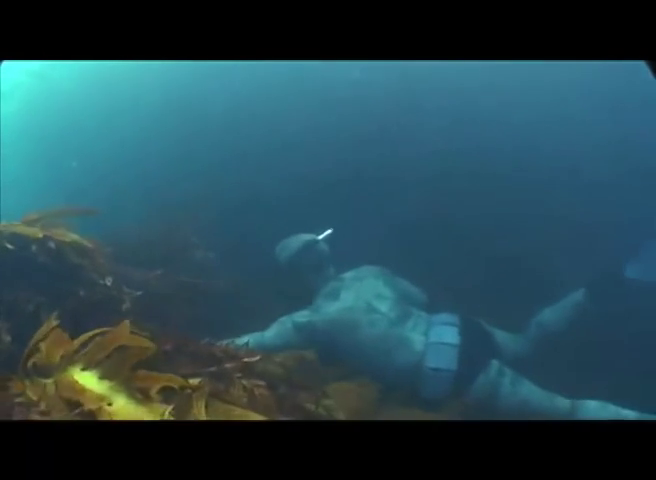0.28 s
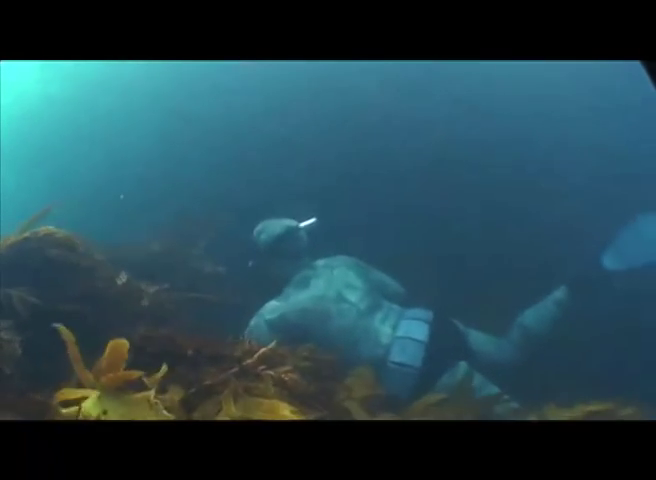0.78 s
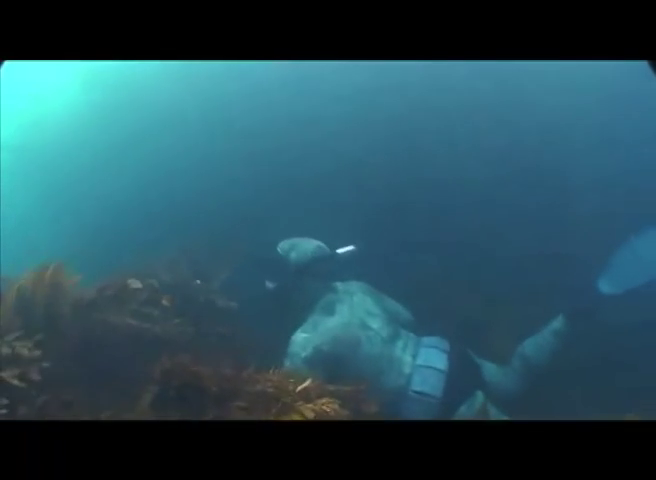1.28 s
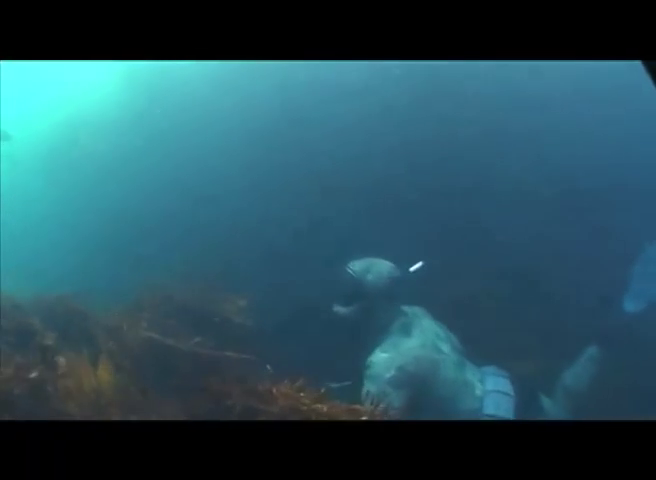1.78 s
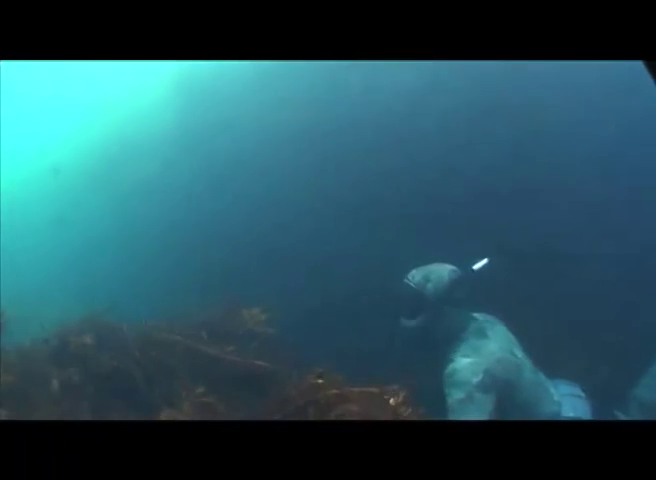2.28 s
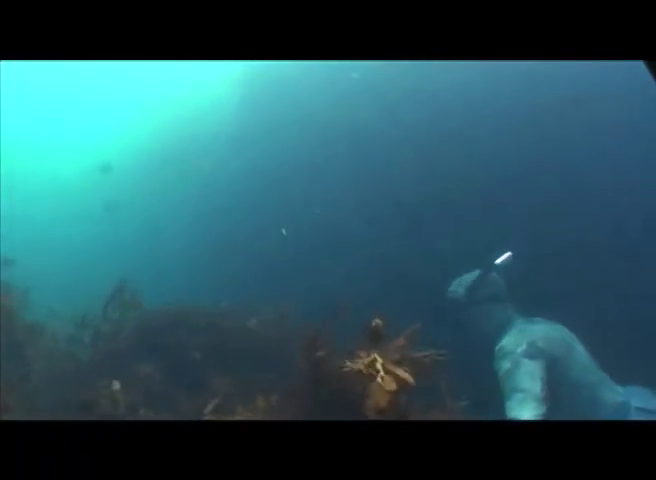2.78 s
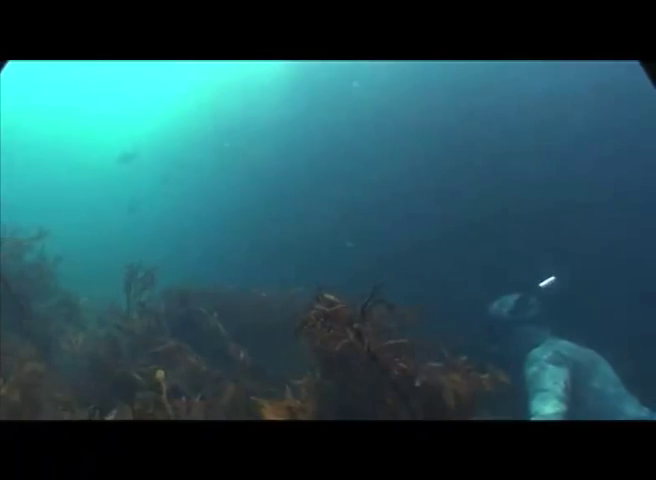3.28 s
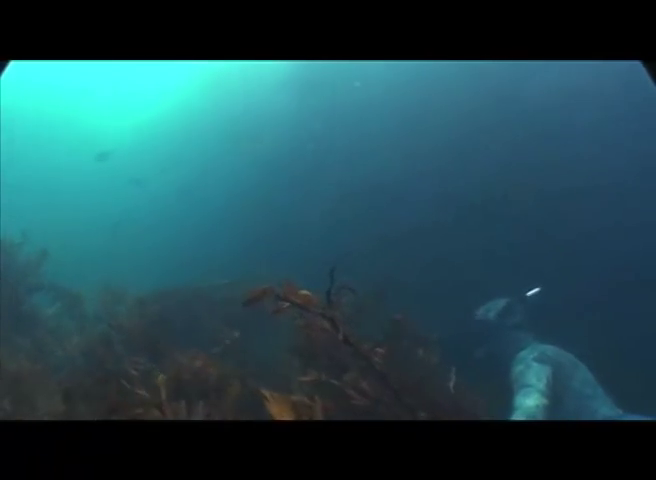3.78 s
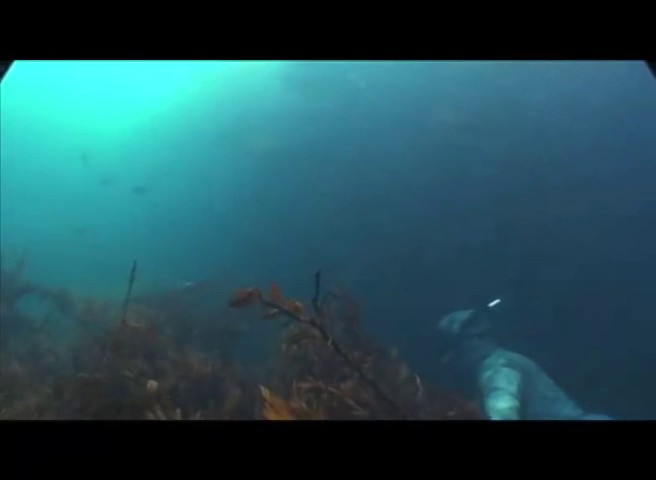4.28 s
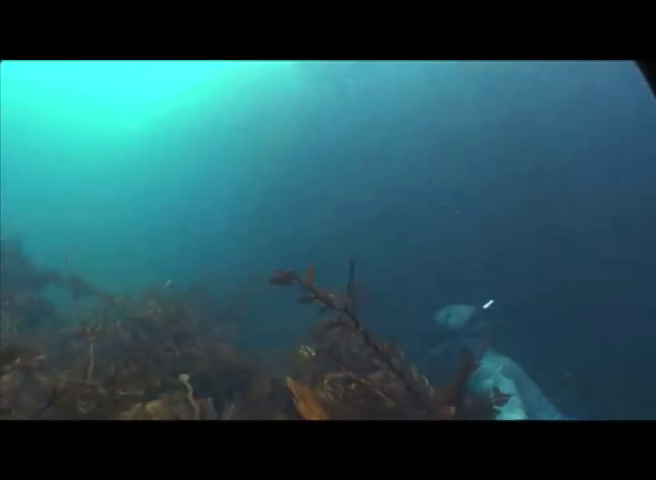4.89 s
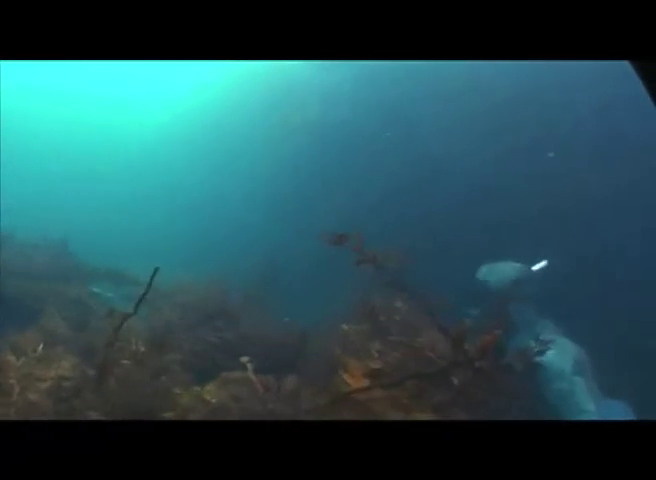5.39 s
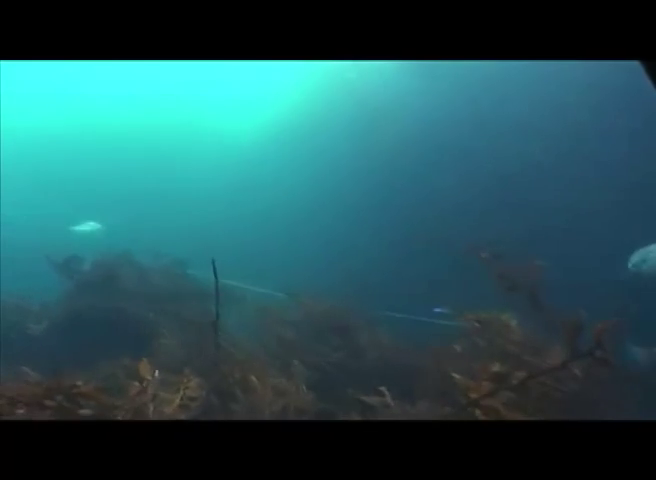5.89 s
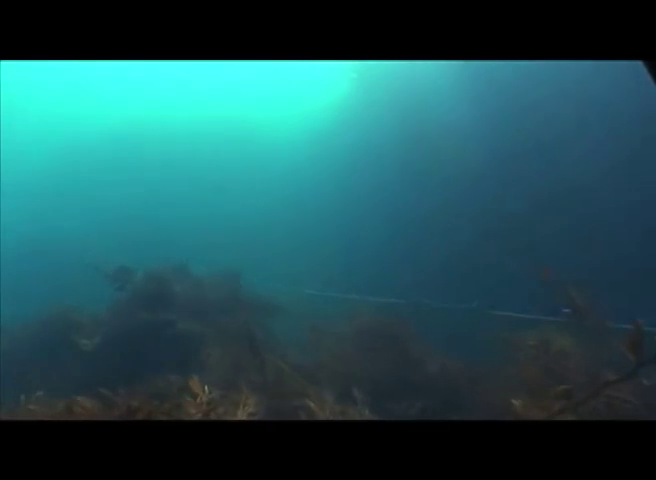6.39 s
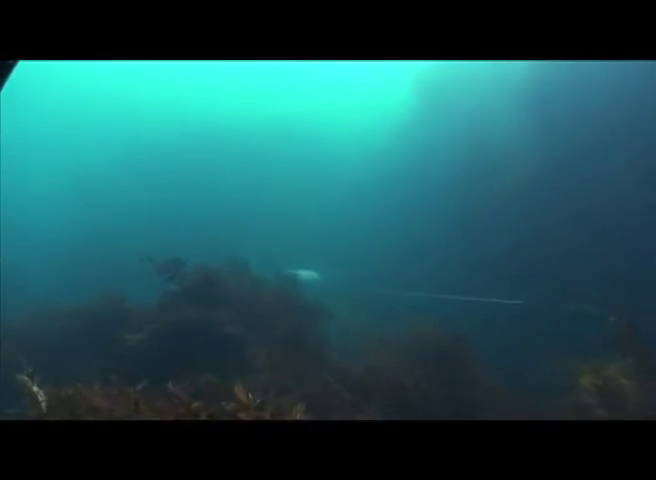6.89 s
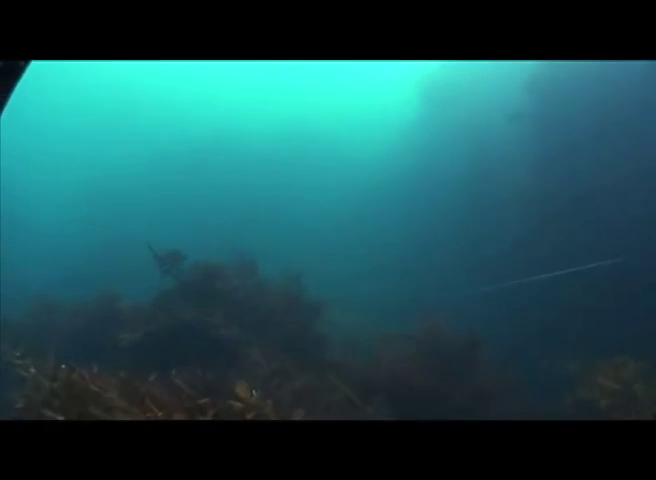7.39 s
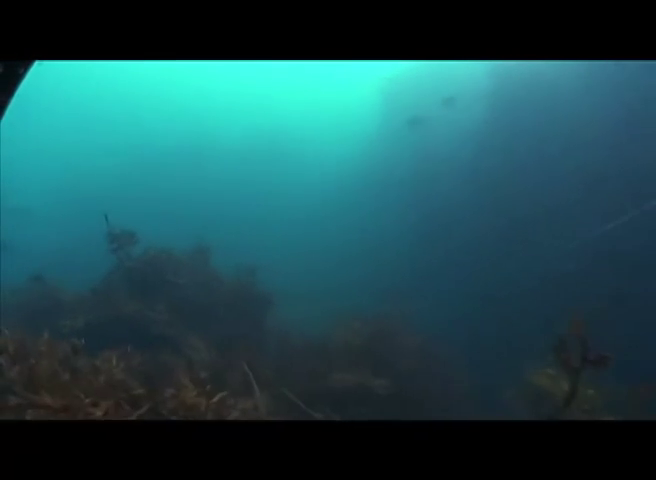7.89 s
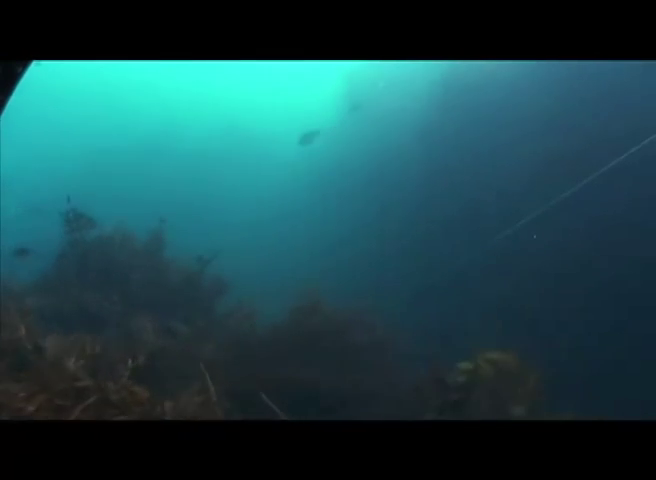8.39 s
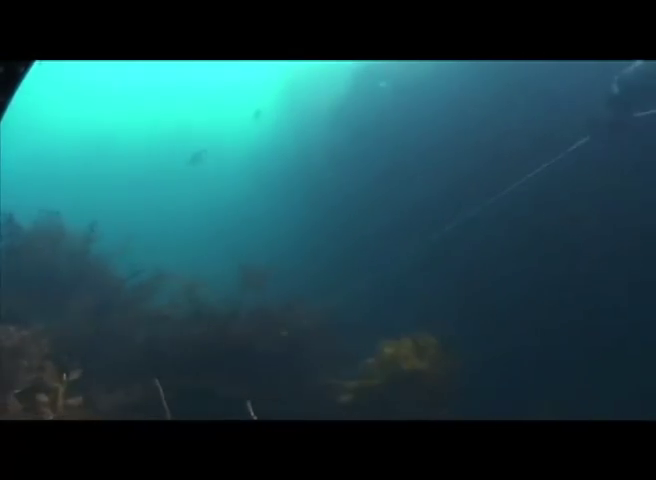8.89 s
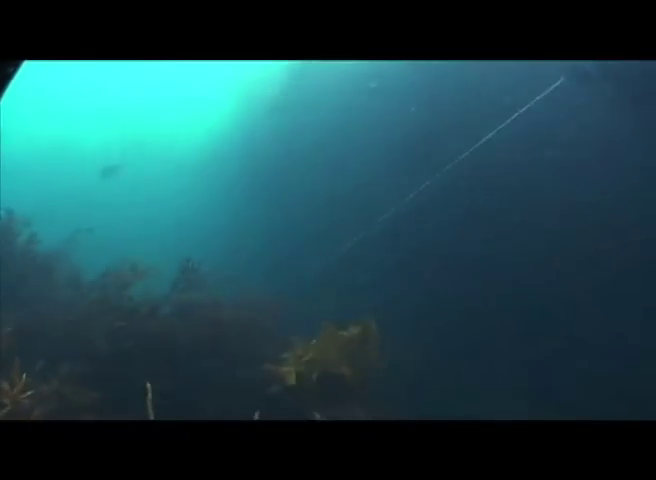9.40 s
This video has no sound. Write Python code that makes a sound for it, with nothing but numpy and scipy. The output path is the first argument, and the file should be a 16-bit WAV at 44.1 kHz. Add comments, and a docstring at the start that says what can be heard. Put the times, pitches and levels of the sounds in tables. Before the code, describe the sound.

Muffled underwater wash and wavering electronic hum inside a watertight case, with sharp shrimp snaps and a loud burst of hand knocks midway.

```python
"""A kelp reef under the sea, heard from a camera drifting in a watertight case.
The wash of the sea is noise that rings the case; the electronics hum and whine as wavering tones.
Shrimp snaps are short bursts of noise. The hand on the case taps, knocks and scrapes as noise bursts
that ring the case, and squeaks as short stacks of harmonics. Water sloshes, bumps and churns as low noise.
"""
import sys
import numpy as np
from scipy import signal
from scipy.fft import rfft, irfft, next_fast_len
from scipy.io import wavfile
from scipy.ndimage import uniform_filter1d

SR = 44100
rng = np.random.default_rng(int(sys.argv[2]) if len(sys.argv) > 2 else 0)


def store_wav(level_fs):
    """Save 16-bit WAV to argv[1]."""
    pcm = np.round(np.clip(np.atleast_2d(level_fs), -1, 1) * 32767)
    wavfile.write(sys.argv[1], SR, pcm.T.astype(np.int16))


N = 425565  # length in samples


def amp(db):
    """Turns decibels into a gain."""
    return 10 ** (np.asarray(db) / 20)


def unit(x):
    """Scales a sound to rms 1."""
    return x / np.sqrt(np.mean(x ** 2) + 1e-20)


def clock():
    """Time of every sample in seconds."""
    return np.arange(N) / SR


def read(points, hz):
    """Reads a curve of (f/Hz, level/dB) points, joined by lines on a log-frequency axis."""
    f, db = np.transpose(points)
    return np.interp(np.log(hz + 1), np.log(f + 1), db)


def add(mix, s, sound):
    """Mixes a sound in at time s."""
    part = mix[..., max(round(s * SR), 0):][..., :sound.shape[-1]]
    part += sound[..., :part.shape[-1]]


def bins(size=8192):
    """Frequencies in Hz on which filters are drawn."""
    return np.fft.rfftfreq(size, 1 / SR)


def colour(x, db):
    """Filters with the gain db(bins), never ahead of time: its peaks ring after the blow."""
    mirrored = np.concatenate([db, db[-2:0:-1]])
    log_gain = np.log(amp(mirrored))
    response = np.exp(np.conj(signal.hilbert(log_gain)))  # minimum phase
    taps = np.fft.ifft(response).real[:len(db)]
    return signal.oaconvolve(np.atleast_2d(x), taps[None], axes=1)


def wander(rate_hz):
    """A random line of rms 1 that heads for a new value rate_hz times a second."""
    knots = rng.standard_normal(400)
    return unit(np.interp(clock() * rate_hz, np.arange(len(knots)), knots))


def dying(start_s, rise_s, fade_db_per_s):
    """An envelope that rises from start_s on while fading by a steady number of dB a second."""
    age = np.maximum(clock() - start_s, 0)
    return np.minimum(age / rise_s, 1) * amp(-fade_db_per_s * age)


def ports(mid, side, apart):
    """Left and right: the two microphones differ by the side noise, coloured by the curve apart."""
    side = colour(side, read(apart, bins()))[0, :len(mid)]
    return np.array([mid + side, mid - side])


def low_noise(hz, octaves, window, apart=0.1):
    """Noise in a band around hz, under a window, nearly alike at both microphones; shared part has rms 1."""
    size = next_fast_len(len(window) + SR)
    distance = np.log2((bins(size=size) + 1) / hz) / octaves
    band = np.exp(-.5 * distance ** 2)
    noise = irfft(rfft(rng.standard_normal((2, size))) * band)
    mid, side = noise[:, :len(window)] * window
    return unit(mid) + np.array([[apart], [-apart]]) * unit(side)


def rattle(seconds, size=4096, count=3):
    """A quickly rising, dying burst of noise that holds all frequencies about equally."""
    t = np.arange(size) / SR
    fade = (1 - np.exp(-t / .0007)) * np.exp(-t / max(seconds, .0002))
    burst = rng.standard_normal((2, size)) * fade
    for _ in range(count):  # even out the spectrum, then restore the fade
        even = irfft(np.exp(1j * np.angle(rfft(burst))))
        loudness = np.sqrt(abs(uniform_filter1d(even ** 2, size=90)) + 1e-12)
        burst = fade * even / loudness
    return burst


def strike(db, seconds, shape_db, apart):
    """A burst coloured by shape_db; its shared part has the energy of 10 ms at level db."""
    mid, side = colour(rattle(seconds), shape_db)
    gain = amp(db) * np.sqrt(SR / 100 / np.sum(mid ** 2))
    return gain * ports(mid, side, apart)


def contact_db(centre_hz, treble_db, below, above, treble):
    """A hump of force around centre_hz with slopes in dB an octave, plus a thin crack of treble."""
    octaves = np.log2((bins() + 10) / centre_hz)
    hump = 1 / (amp(-below * octaves) + amp(above * octaves))
    return 20 * np.log10(2 * hump + amp(treble_db + read(treble, bins())))


# how firmly the hand clamps the case: (t/s, grip 0-1)
HAND_GRIP = [(3.7, 0), (4.4, 1), (5.5, 1), (6, 0)]


def grip_at(s):
    """How firmly the case is held at time s."""
    return np.interp(s, *np.transpose(HAND_GRIP))


# resonances of the case, before each sound scales them:
# (f/Hz, width/Hz, lift level/dB when held loosely, lift level/dB when gripped)
CASE_RESONANCES = [(500, 140, 5.5, 11.5), (621.5, 52, 15, 7.5), (743, 69, 2, 1.5), (896, 15, 0.5, 6),
                   (1035, 35, 1.5, 8), (1135.5, 111, 12.5, 15.5), (1402, 99, 3, 8.5), (1611, 84, 10, 14),
                   (1797, 50, 6, 2), (1950, 86, 0, 9.5), (2104, 178, 12.5, 10.5), (2496, 170, 8.5, 13),
                   (2674, 160, 10, 5), (3050, 40, -5, 10), (3276, 130, 11.5, 2.5), (3520, 130, -3, 9),
                   (3950, 180, 2, 8.5), (5690, 80, 24, 11.5), (6650, 560, 9, 9), (7550, 450, 0.5, 6.5)]


def case_db(grip):
    """Lift of the case's resonances at every frequency; a firm grip favours other ones."""
    total = 0
    for hz, width, free_db, held_db in CASE_RESONANCES:
        lift = free_db + grip * (held_db - free_db)
        total = total + lift / (1 + (2 * (bins() - hz) / width) ** 2)
    return total


# relative spectrum of the wash before the case colours it: (f/Hz, level/dB per Hz)
SEA_SPECTRUM = [(10, 6.5), (35, 2), (70, -1.5), (190, -26), (400, -7.5), (550, -2), (780, 3), (880, -13.5),
                (1050, -5), (1500, 1), (2400, -4.5), (3000, -23), (4500, -23), (9000, -28)]
SEA_DB = -51


def sea(ringing=0.98, swell_db=.5, grain_db=2.5):
    """Countless far crackles merge into a gently swelling wash that rings the case."""
    sizes = np.minimum(rng.exponential(1, N), 5)
    crackle = rng.standard_normal(N) * amp(grain_db * sizes)
    shape = read(SEA_SPECTRUM, bins()) + ringing * case_db(grip=0)
    wash = colour(crackle, shape)[:, :N]
    return amp(SEA_DB + swell_db * wander(5)) * unit(wash)


# relative spectrum of the hiss that differs between the two microphones: (f/Hz, level/dB per Hz)
HISS_SPECTRUM = [(20, 3), (120, -2), (350, 2.5), (750, 4.5), (900, -1), (1050, 5.5), (1200, 1.5),
                 (2000, -2.5), (3700, -5.5), (5000, -12), (7000, -9), (10500, -19), (15000, -75)]
HISS_DB, TOP_DB = -53.5, -72.5


def hiss():
    """Each microphone adds its own noise; a faint high hiss is the same in both."""
    own = colour(rng.standard_normal((2, N)), read(HISS_SPECTRUM, bins()))[:, :N]
    high = [(3000, -15), (9000, -2), (11500, 1.5), (15000, -3)]
    top = colour(rng.standard_normal(N), read(high, bins()))[:, :N]
    return amp(HISS_DB) * unit(own) + amp(TOP_DB) * unit(top)


def tone(hz, db, apart, waver_db=2.0, drift=0.88, waver_hz=5):
    """A tone wavering in level and phase (drift, radians), out of step at the microphones by +-apart."""
    phase = 2 * np.pi * (hz * clock() + rng.random()) + drift * wander(waver_hz)
    level = np.sqrt(2) * amp(db + waver_db * wander(waver_hz))
    return level * np.sin(phase + np.array([[apart], [-apart]]))


DRONE_HZ, DRONE_DB = 575.7, -59.5
BEAT_DB, BEAT_S, BEAT_DIP_S = 5, 3.93, .4  # swing either way, period, time of the first dip


def drone():
    """A low tone of the electronics swells and fades in a slow, even beat."""
    beat = np.cos(2 * np.pi * (clock() - BEAT_DIP_S) / BEAT_S)
    return tone(DRONE_HZ, DRONE_DB - BEAT_DB * beat, apart=0.22)


# main tone of the hum, level before it flutters: (f/Hz, level/dB rms)
FLUTTER_TONE = (600, -56.5)
# steady tones of the hum, level before they waver: (f/Hz, level/dB rms)
HUM_TONES = [(475, -71), (1006, -69), (1150, -63), (1803, -64), (1822, -70), (1954, -73), (2182, -62),
             (2277, -71), (2374, -72), (2638, -72), (3093, -73), (3286, -75)]


def hum():
    """The electronics hum on many tones; the main one flutters faster than the rest."""
    out = tone(*FLUTTER_TONE, apart=.05, waver_db=3.0, drift=0.83, waver_hz=16)
    for hz, db in HUM_TONES:
        out += tone(hz, db, apart=0.089)
    return out


# high steady tones of the electronics, level before they waver: (f/Hz, level/dB rms)
WHINE_TONES = [(3741, -81), (4502, -81), (4886, -81), (5098, -80), (5398, -77), (5696, -75), (5741, -82),
               (6216, -82), (6372, -77), (6391, -69), (6566, -80), (6600, -77), (6675, -79), (6716, -74),
               (7740, -78), (7962, -84), (8338, -86)]


def whine():
    """The electronics whine on high tones, each leading at one microphone or the other by chance."""
    return sum(tone(hz, db, apart=0.17 * rng.choice([-1, 1])) for hz, db in WHINE_TONES)


# relative strength of the faint sidebands around the whine: (f/Hz, level/dB)
HAZE_SPECTRUM = [(3000, -27), (4300, -39), (4900, 13), (5300, 4), (6100, -5), (6350, 16.5), (6750, 10),
                 (7100, -21), (8700, 7), (9300, -16), (11000, -10)]
HAZE_DB, HAZE_UNEVEN_DB = -68, 5
FRAME_HZ = 25  # the camera's frame rate


def haze():
    """A haze of faint, steady sidebands spaced by the camera's frame rate."""
    hz = np.arange(3000, 11000, FRAME_HZ)
    level = amp(read(HAZE_SPECTRUM, hz) + HAZE_UNEVEN_DB * rng.standard_normal(len(hz)))
    # partly different phases at the two microphones
    phase = 2 * np.pi * rng.random(len(hz)) + 0.64 * rng.standard_normal((2, len(hz)))
    lines = np.zeros((2, N // 2 + 1), complex)
    lines[:, np.round(hz * N / SR).astype(int)] = level * np.exp(1j * phase)
    return amp(HAZE_DB) * unit(irfft(lines, N))


# near shrimp snaps: (t/s, level/dB over 10 ms of the ring, centre f/Hz, treble level/dB)
NEAR_SNAPS = [(.200, -44.5, 2600, -19), (.332, -50, 2570, -21), (1.651, -45, 3000, -7),
              (1.7155, -48, 4100, -27), (1.9852, -42, 2700, -26), (2.4085, -40.5, 3530, -40),
              (2.615, -45.5, 2400, -27), (2.885, -48.5, 2590, -32), (3.6135, -46, 3400, -24),
              (6.652, -38.5, 2630, -21), (7.114, -48, 4200, -25), (7.354, -47, 3660, -32),
              (8.8865, -46, 4740, -6)]
FAR_SNAPS_PER_S, FAR_DB, FAR_SPREAD_DB = 14, -64, 2.5
SNAP_RING_S, SNAP_CRACK_S, SNAP_CRACK_DB = 0.0048, 0.00018, -4


def snaps(ragged_db=3.5):
    """Shrimp snaps, each a crack and a short ring: near ones over a random crackle from the reef."""
    out = np.zeros((2, N))
    crack = [(300, -30), (3000, 10.5), (6000, 1), (8000, 5.5), (11500, -5.0), (15000, -18)]
    apart = [(1500, -24), (4000, -2.5), (8000, -6), (12000, -24)]
    when, size, pitch, edge = rng.random((round(FAR_SNAPS_PER_S * N / SR), 4)).T
    far_level = FAR_DB - FAR_SPREAD_DB * np.log(size + 0.0083)
    far = np.transpose([when * N / SR, far_level, 2200 * 2 ** (1.2 * pitch), -24 + 16 * edge])
    knots = np.arange(0, SR / 2, 450)
    case, crack_shape = 0.81 * case_db(grip=1 / 2), read(crack, bins())
    for s, db, hz, treble_db in list(NEAR_SNAPS) + list(far):
        # each path over the rocks favours other bands
        ragged = np.interp(bins(), knots, rng.standard_normal(len(knots)))
        force = contact_db(hz, treble_db - 0.5, below=16.7, above=25, treble=crack)
        add(out, s, strike(db, SNAP_RING_S, force + case + ragged_db * ragged, apart))
        add(out, s, strike(db + treble_db + SNAP_CRACK_DB, SNAP_CRACK_S, crack_shape, apart))
    return out


# a higher contact is shorter and cracks more; rattle and crack values hold at CONTACT_HZ
CONTACT_HZ = 1500
RATTLE_S, RATTLE_HALVINGS_PER_OCTAVE = 0.00527, 0.12
CRACK_DB, CRACK_DB_PER_OCTAVE = -29.5, 7.5
FREE_RINGING = 0.16  # extra share of ringing when held loosely


def contact(s, db, hz, seconds, crack_db):
    """One touch of the case: a brief rattle that rings its resonances."""
    crack = [(100, 1.0), (1500, 16.0), (5000, 2), (6000, -21), (7300, 1.5), (9500, -3.5), (15000, -22)]
    apart = [(200, -42), (700, -15), (1300, -11), (2300, -16), (4300, -3), (8000, -4), (12000, -33)]
    grip, octaves = grip_at(s), np.log2(hz / CONTACT_HZ)
    ring = (1 + FREE_RINGING * (1 - grip)) * case_db(grip)
    treble_db = crack_db + CRACK_DB_PER_OCTAVE * octaves
    force = contact_db(hz, treble_db, below=21.0, above=19.4, treble=crack)
    return strike(db, seconds / 2 ** (RATTLE_HALVINGS_PER_OCTAVE * octaves), force + ring, apart)


TAPS_PER_S, TAP_DB, TAP_SPREAD_DB, TAP_HZ, TAP_OCTAVES = 3, -48, 10, 1300, .7


def taps():
    """Light taps of shifting fingers touch the case at random."""
    out = np.zeros((2, N))
    for when, weak, pitch in rng.random((round(TAPS_PER_S * N / SR), 3)):
        s = when * N / SR
        hz = TAP_HZ * 2 ** (TAP_OCTAVES * (pitch - .5))
        add(out, s, contact(s, TAP_DB - TAP_SPREAD_DB * weak, hz, RATTLE_S, CRACK_DB))
    return out


# dull pushes of water against the case: (t/s, level/dB rms)
WATER_PUSHES = [(1.53, -66.5), (2.257, -63), (3.63, -59), (4.277, -54), (4.501, -53), (4.699, -54),
                (5.83, -65)]
SLOSH_S, SLOSH_HZ, SLOSH_OCTAVES = 0.0604, 108, .6


def sloshes():
    """Soft swells of low noise as water pushes on the case."""
    out = np.zeros((2, N))
    for s, db in WATER_PUSHES:
        add(out, s, amp(db) * low_noise(SLOSH_HZ, SLOSH_OCTAVES, np.hanning(round(SLOSH_S * SR))))
    return out


# knocks on the case: (t/s, level/dB over 10 ms without the thump, centre f/Hz)
CASE_KNOCKS = [(2.494, -41.5, 1490), (3.4908, -24.5, 1670), (3.4937, -24, 1380), (4.55, -20.5, 1480),
               (4.5565, -14.5, 760), (4.5616, -15, 1440), (4.572, -19.5, 1510), (4.5797, -17.5, 1890),
               (4.5942, -21, 1050), (4.7027, -38.5, 3520), (5.3892, -27, 1730), (5.39, -40.5, 6800),
               (5.4298, -27.5, 1480), (5.432, -49, 7060), (6.949, -41, 1110)]
# the gripping hand adds a thump that grows faster than the blow and equals it at THUMP_EVEN_DB
THUMP_HZ, THUMP_S, THUMP_EVEN_DB, THUMP_GROWTH = 674, 0.00438, -8.5, 0.56


def knocks():
    """Blows rattle briefly and ring the case; a gripping hand adds a low thump."""
    out = np.zeros((2, N))
    for s, db, hz in CASE_KNOCKS:
        add(out, s, contact(s, db, hz, RATTLE_S, CRACK_DB))
        thump_db = db + THUMP_GROWTH * (db - THUMP_EVEN_DB)
        add(out, s, grip_at(s) * contact(s, thump_db, THUMP_HZ, THUMP_S, CRACK_DB))
    return out


# short hollow bumps: (t/s, level/dB rms, centre f/Hz)
HOLLOW_BUMPS = [(2.779, -43, 556), (2.898, -46.5, 570), (4.679, -46.5, 390), (6.735, -46.5, 550),
                (7.688, -42, 588), (8.705, -47.5, 610)]
BUMP_S, BUMP_OCTAVES = 0.026, 0.16


def bumps():
    """Short hollow bumps: narrow bands of noise that swell and fade smoothly."""
    out = np.zeros((2, N))
    for s, db, hz in HOLLOW_BUMPS:
        add(out, s, amp(db) * low_noise(hz, BUMP_OCTAVES, np.hanning(round(BUMP_S * SR))))
    return out


# the hand scrapes over the case: (t/s, level/dB over 10 ms without the thump, centre f/Hz)
HAND_SCRAPES = [(4.473, -45, 2700), (4.5202, -27, 2240), (4.531, -29, 2900), (4.603, -36, 2100),
                (5.226, -44.5, 2300), (5.354, -41.5, 2900), (5.367, -34.5, 2000), (5.4, -36, 1500),
                (5.862, -36.5, 945)]
SCRAPE_S, SCRAPE_CRACK_DB, SCRAPE_THUMP_DB = 0.015, -23, -10.5  # the thump is relative to the scrape


def scrapes():
    """The hand scrapes over the case: a longer rattle than a knock, with a softer thump beneath."""
    out = np.zeros((2, N))
    for s, db, hz in HAND_SCRAPES:
        add(out, s, contact(s, db, hz, SCRAPE_S, SCRAPE_CRACK_DB))
        add(out, s, contact(s, db + SCRAPE_THUMP_DB, THUMP_HZ, SCRAPE_S, CRACK_DB))
    return out


CHURN_START_S, CHURN_RISE_S, CHURN_LUMPS_PER_S, CHURN_LUMPY_DB = 4.55, .015, 30, 2.8
CHURN_DB, CHURN_FADE_DB_PER_S, CHURN_HZ, CHURN_OCTAVES = -43.5, 57, 115, 1.8
WAKE_DB, WAKE_FADE_DB_PER_S, WAKE_HZ, WAKE_OCTAVES = -64.5, 5, 290, 0.54


def churn():
    """Water stirred at the hardest knocks rumbles in lumps and settles, leaving a faint wake."""
    rumble = amp(CHURN_DB) * low_noise(CHURN_HZ, CHURN_OCTAVES, np.ones(N))
    rumble *= dying(CHURN_START_S, CHURN_RISE_S, CHURN_FADE_DB_PER_S)
    wake = amp(WAKE_DB) * low_noise(WAKE_HZ, WAKE_OCTAVES, np.ones(N))
    wake *= dying(CHURN_START_S, CHURN_RISE_S, WAKE_FADE_DB_PER_S)
    return (rumble + wake) * amp(CHURN_LUMPY_DB * wander(CHURN_LUMPS_PER_S))


# fingers slipping on the case:
# (t/s, length t/s, level/dB rms, start f/Hz, end f/Hz, fall level/dB per harmonic)
FINGER_SQUEAKS = [(5.018, 0.043, -46, 827, 840, 6), (5.128, 0.049, -44.5, 833, 830, 3),
                  (7.574, 0.033, -47, 788, 816, 5.5), (7.657, 0.039, -43, 824, 820, 4),
                  (9.462, 0.051, -44.5, 147, 125, 13)]
# strength of each harmonic in turn, before the fall: (level/dB)
HARMONIC_LEVELS = [-2.5, 1, 8, -7, -16]


def squeaks(jitter=0.026, rough=0.34):
    """Stick and slip of a finger: a short stack of harmonics, unsteady in pitch and strength."""
    out = np.zeros(N)
    for s, seconds, db, start_hz, end_hz, fall_db in FINGER_SQUEAKS:
        n = round(seconds * SR)
        smooth = unit(uniform_filter1d(rng.standard_normal((2, SR)), size=110))
        unsteady, strength = smooth[:, :n]
        turns = np.cumsum(np.linspace(start_hz, end_hz, n) * (1 + jitter * unsteady)) / SR
        stack = np.zeros(n)
        for k, h in enumerate(HARMONIC_LEVELS):
            stack += amp(h - fall_db * k) * np.sin(2 * np.pi * (k + 1) * turns)
        add(out, s, amp(db) * unit(stack * (1 + rough * strength) * signal.windows.tukey(n, .6)))
    return out


BUZZ_START_S, BUZZ_RISE_S, BUZZ_FADE_DB_PER_S = 5.35, .1, 6
BUZZ_HZ, BUZZ_DB, BUZZ_OCTAVE_DB = 150, -71, -68  # levels before the fade


def buzz():
    """A low buzz, a tone and its octave, comes up quickly and dies away slowly."""
    pair = tone(BUZZ_HZ, BUZZ_DB, apart=0) + tone(2 * BUZZ_HZ, BUZZ_OCTAVE_DB, apart=0)
    return dying(BUZZ_START_S, BUZZ_RISE_S, BUZZ_FADE_DB_PER_S) * pair


def scene():
    """Everything that reaches the microphones inside the case."""
    steady = sea() + hiss() + drone() + hum() + whine() + haze()
    hand = taps() + knocks() + scrapes() + squeaks()
    water = sloshes() + bumps() + churn()
    return steady + snaps() + hand + water + buzz()


# left minus right sensitivity of the microphones: (f/Hz, level/dB)
MICROPHONE_TILT = [(60, 0.5), (370, 2.5), (690, -0.5), (1270, 0), (2330, -1.5), (4300, 0), (7900, -3.5),
                   (14500, 1.5)]
EDGE_HZ = 15050  # upper band limit


def record(dry, lag=0.15):
    """The microphones differ a little in colour, the left lags (radians) in the mids; then the band limit."""
    hz = np.fft.rfftfreq(N, 1 / SR)
    angle = lag * np.interp(hz, [0, 2000, 4000, 9000], [0, 1, 1, 0])
    left = amp(read(MICROPHONE_TILT, hz) / 2) * np.exp(-.5j * angle)
    heard = irfft(rfft(dry) * np.array([left, 1 / left]), N)
    low_pass = signal.firwin(801, EDGE_HZ, window=("kaiser", 9), fs=SR)
    return signal.oaconvolve(heard, low_pass[None], "same")


dry = scene()
out = record(dry)
store_wav(out)
```